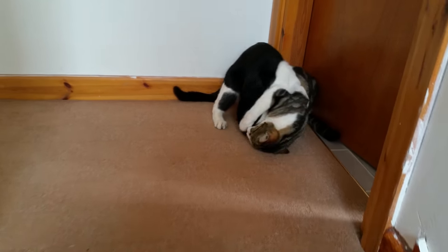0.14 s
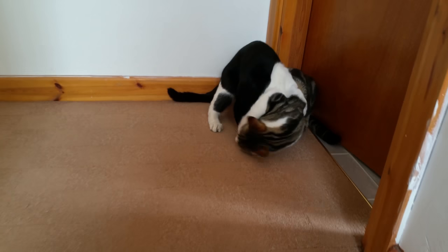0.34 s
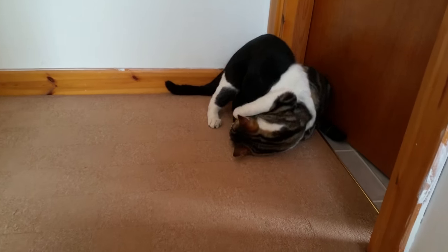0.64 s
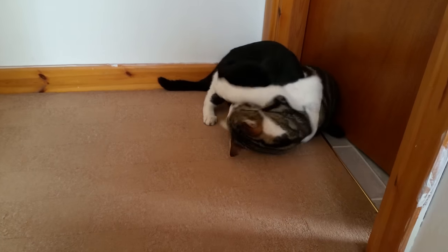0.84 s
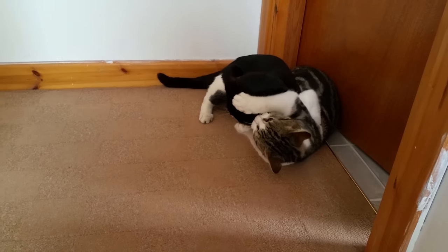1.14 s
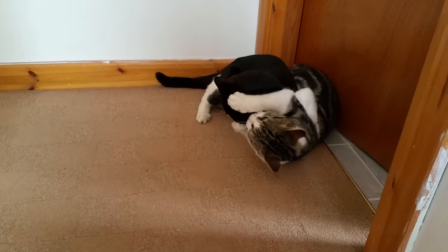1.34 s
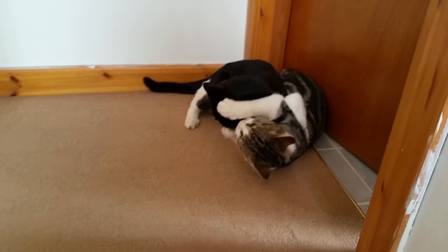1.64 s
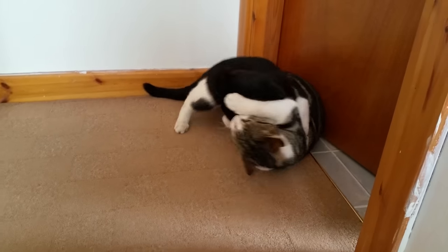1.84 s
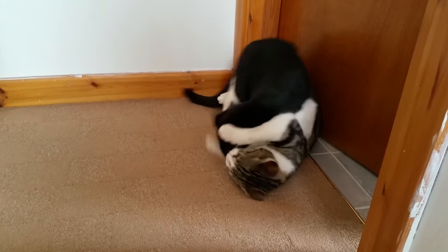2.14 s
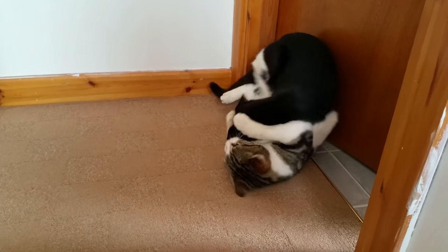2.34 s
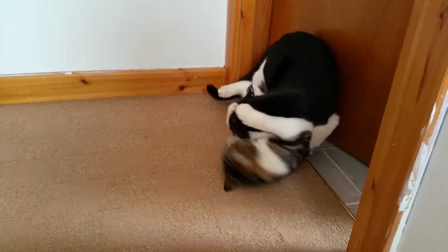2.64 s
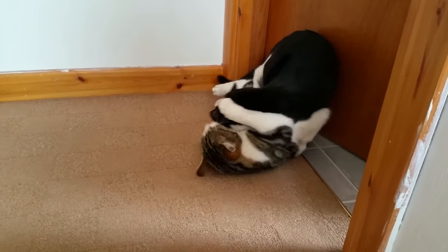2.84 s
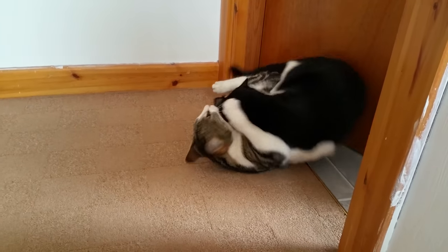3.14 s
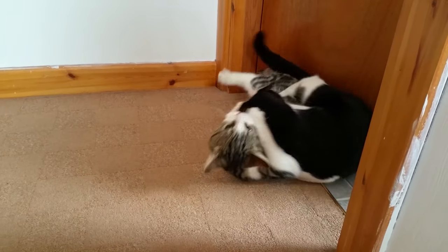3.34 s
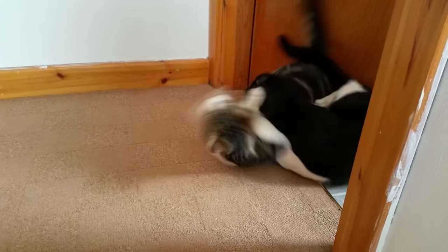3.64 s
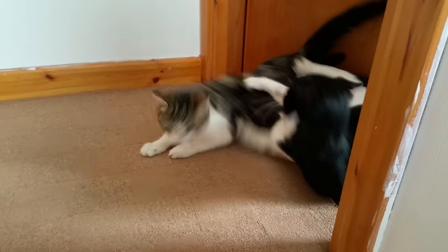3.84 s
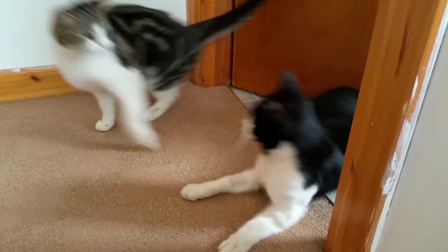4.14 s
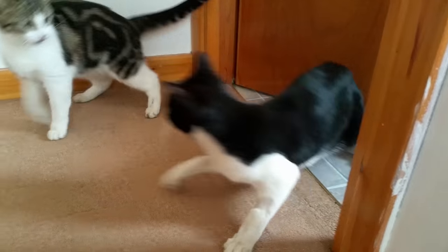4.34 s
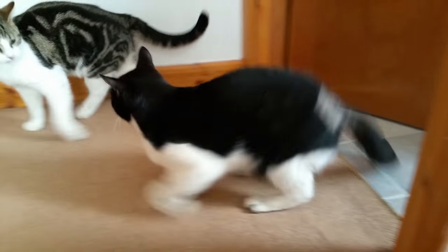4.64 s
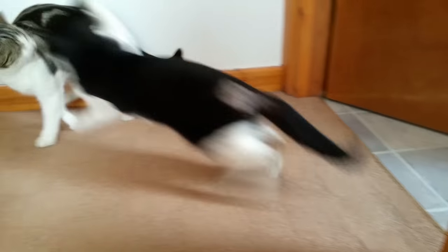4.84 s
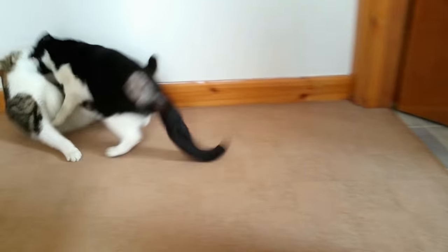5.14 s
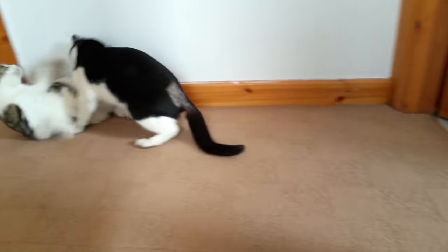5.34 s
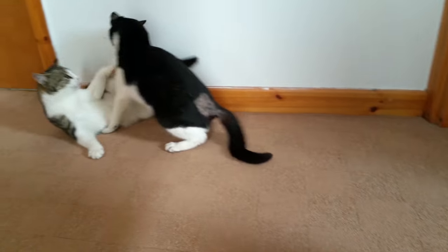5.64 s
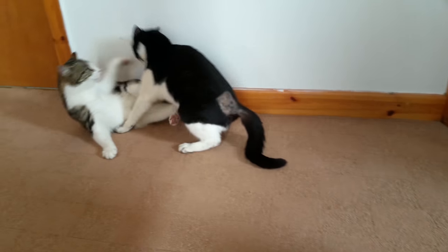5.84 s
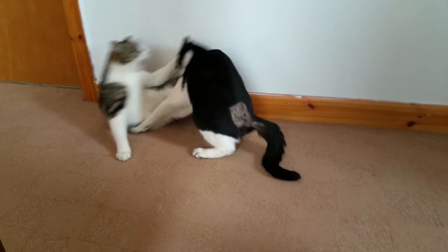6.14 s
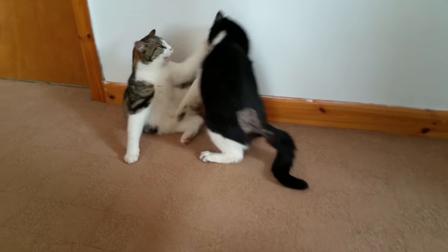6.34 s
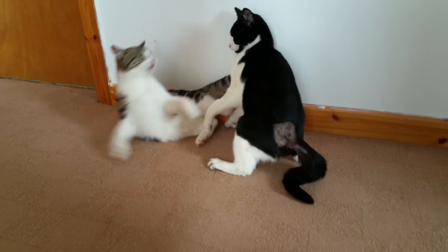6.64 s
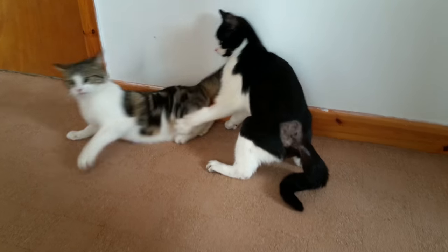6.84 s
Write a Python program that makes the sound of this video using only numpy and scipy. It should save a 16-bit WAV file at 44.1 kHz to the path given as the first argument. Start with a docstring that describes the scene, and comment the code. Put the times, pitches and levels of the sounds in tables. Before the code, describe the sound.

Over a soft rush of indoor air and a machine's faint hum and thin whine, a cat lets out a quiet, drawn-out, raspy meow. Scattered low bumps and light claw ticks on carpet follow as two cats tussle, growing busier with brief squeaky cries. A loud, short yowl breaks out among thumps, then one last meow and a bump. The sound is fairly close, with a slight echo from narrow hallway walls.

```python
"""A small carpeted hallway: two cats wrestle a metre or two from a phone with two microphone ports.
One meows, squeaks and yowls: vocal-fold harmonics through chest, mouth and throat, plus breath hiss.
Bodies and paws ring the boards of floor and door; claws tick in the pile; close walls echo.
Under it, the steady rush of house air and a household machine's faint hum and whine."""
import sys
import numpy as np
from scipy import signal
from scipy.fft import rfft, irfft
from scipy.io import wavfile
from scipy.ndimage import uniform_filter1d

SR = 44100
rng = np.random.default_rng(int(sys.argv[2]) if len(sys.argv) > 2 else 0)


def to_wav(s):
    """Save 16-bit WAV."""
    ch = np.atleast_2d(s).T  # columns
    pcm = np.round(np.clip(ch, -1, 1) * 32767)  # PCM
    wavfile.write(sys.argv[1], SR, pcm.astype(np.int16))


N = 308700
T = np.arange(N) / SR

# air rush: (frequency [Hz], relative density [dB])
AIR_SPECTRUM = [(15, -37), (25, -32), (60, -17), (171, -8), (275, -6), (381, -12.5), (541, -7),
                (705, -16.5), (1201, -20.5), (1501, -17.5), (2501, -29), (3731, -34), (5601, -33),
                (6001, -39), (15601, -46)]
# diffuse sound: (frequency [Hz], left-right correlation [-1..1])
COHERENCE = [(25, 0.77), (60, 0.95), (250, 0.95), (500, 0.56), (1000, -0.02), (2000, -0.17), (8000, -0.052)]
# machine tones: (frequency [Hz], rms level [dB], unsteady share [0..1], width [Hz], pan [dB])
HUM_TONES = [(280, -68, .9, 15, 1), (420, -72, .7, 8, 1), (549, -60, .15, 6, 2), (1500, -72, .7, 25, 2)]
# whine envelope, in consecutive stretches: (time [s], rms level [dB])
WHINE_LEVELS = [
    [(0.0, -84), (0.27, -71), (0.33, -74), (0.53, -67), (0.7, -82), (0.8, -69), (0.9, -73.5), (1.05, -88),
     (1.29, -77.5), (1.73, -73), (1.91, -81), (2.14, -76), (2.34, -82.5), (2.53, -70.5), (2.73, -78),
     (3.08, -82), (3.57, -81), (3.69, -71), (4.02, -79), (4.12, -80), (4.23, -73.5), (4.44, -83),
     (4.64, -66), (5.04, -71)],
    [(5.48, -68.5), (5.69, -72.5), (5.98, -70), (6.2, -78)],
    [(6.55, -80), (6.78, -71), (7.0, -76)],
]
# (time [s], pitch [Hz])
WHINE_PITCH = [(0, 4383), (2.3, 4376), (4.5, 4393), (7, 4404)]
# blows on floor and door: (time [s], level [dB], hardness [dB/octave], relative knock [dB])
THUMPS = [(0.012, -40.5, 2.5, -14), (1.089, -44, 0, -29), (1.169, -50.5, 7, -5), (2.149, -46, -1, -17),
          (2.796, -43.5, 5, -12), (2.823, -47, 7, 0), (2.928, -43, 5, -13), (2.95, -47, 5, -27),
          (3.13, -35.5, -5.5, -18), (3.449, -42.5, -5.5, -9), (3.838, -27.5, -6.5, -14),
          (3.973, -40.5, -1.5, -4.5), (4.21, -41.5, 1, -15), (4.271, -45.5, 9, -11), (4.296, -43, -4, -8),
          (4.313, -45, 5, -16), (4.4, -39, -5.5, -23), (4.85, -45.5, -12, -32), (5.166, -28, 5.5, -16),
          (5.176, -31.5, 18, -8), (5.189, -40.5, 5.5, -12), (5.29, -35.5, -1.5, -23), (5.396, -38, 20, 2.5),
          (5.493, -40.5, 10, -19), (5.501, -44, 8, -16), (5.736, -39, 1.5, -16), (5.756, -45, 1.5, -15),
          (5.78, -53, -16, 0), (6.483, -34, 0, -2), (6.587, -43, 1, -8)]
# (frequency [Hz], gain [dB], t60 [s])
BOARD_MODES = [(85.2, -14, 0.99), (110.2, -4.5, 0.3), (178.6, -0.5, 0.15), (232, 4, 0.077),
               (315.7, -9, 0.25), (410, 2, 0.051), (525, -2.5, 0.073), (630, -7, 0.096)]
# claws and fur in the carpet: (time [s], peak [dB], centre [Hz], t60 [s])
CLAW_TICKS = [(0.078, -58, 4000, .04), (1.94, -60, 2800, .25), (2.218, -53, 1650, .06),
              (2.908, -52, 1690, .1), (2.76, -71, 9500, 1.5), (2.92, -69, 9500, 1.5), (3.1, -67, 8500, .9),
              (3.555, -55, 5300, .025), (3.769, -52, 5600, .03), (4.087, -55, 3300, .025),
              (4.087, -58, 7500, .025), (4.27, -57, 1100, .06), (4.499, -61, 11100, .024),
              (4.948, -49, 750, .03), (5.81, -60, 5000, .05), (6.25, -50, 4700, .024)]
# a segment is a short cry, or a stretch of a longer cry between breaks of the voice
# per segment, breakpoints: (time [s], pitch [Hz], level [dB], mouth resonance [Hz], upper throat [dB])
SEGMENT_CONTOURS = [
    [(0.197, 369, -50, 2100, -17), (0.212, 393, -45.5, 2080, -15), (0.228, 382, -40, 2110, -24),
     (0.25, 454.6, -46.5, 2160, -11), (0.265, 542, -47, 2100, -14), (0.285, 576, -51, 2110, -7),
     (0.301, 665, -47.5, 2160, 7), (0.33, 604, -53, 2140, -1)],
    [(0.32, 577, -58, 1740, -1), (0.35, 673, -50, 1790, -14), (0.378, 652, -52.5, 1830, -3),
     (0.396, 667, -53, 1850, -8), (0.414, 685, -47.5, 2010, -5), (0.436, 664, -53.5, 2010, 11),
     (0.45, 710, -42.5, 2020, 8), (0.465, 677, -44, 2030, 14), (0.498, 674, -45, 2000, 11),
     (0.516, 653, -53, 2000, -2), (0.532, 696, -43, 2070, -1), (0.552, 688, -51.5, 2050, 6),
     (0.596, 693.5, -43, 2030, 11), (0.624, 708.4, -46, 1890, 8), (0.64, 686.6, -41.5, 1690, 6),
     (0.66, 689.5, -49, 1590, 7), (0.694, 675.6, -44.5, 1300, -8), (0.712, 667, -43, 1372, 0),
     (0.73, 679.4, -48, 1462, -3), (0.76, 693, -44.5, 1352, -5), (0.788, 664.5, -48, 1334, 0),
     (0.812, 678.5, -44, 1323, 2), (0.83, 698, -54, 1340, -5), (0.855, 673, -39, 1340, -25),
     (0.87, 672.4, -42.5, 1518, -28), (0.89, 677, -45, 1772, -33), (0.91, 690.7, -46, 2093, -28),
     (0.93, 697, -56, 2040, -30), (0.955, 653, -40, 1840, -38)],
    [(0.948, 654, -45, 1904, -12), (0.966, 522, -41, 1903, -15), (0.972, 520, -78, 1902, -40),
     (1.0, 530, -87.5, 1905, -12)],
    [(2.742, 506, -72, 2070, -20), (2.75, 502, -53, 2050, -20), (2.77, 463, -72, 2050, -20)],
    [(2.768, 520, -75, 2200, -14), (2.774, 486.5, -44, 2220, -19), (2.808, 488, -46, 2160, -7),
     (2.816, 476, -53, 2090, -3), (2.845, 457, -57, 1980, -14), (2.86, 470, -76, 1940, -14)],
    [(3.484, 1100, -62, 2150, -28), (3.496, 1139, -51, 2200, -28), (3.512, 1184, -47, 2000, -28),
     (3.526, 1177, -40, 2080, -30)],
    [(3.52, 1142, -30, 1950, -24), (3.532, 916, -42.5, 1950, -19), (3.558, 1064, -44, 1890, -18),
     (3.578, 1080, -56, 1950, -22), (3.595, 1070, -62, 1950, -24)],
    [(3.657, 610, -55, 1840, -20), (3.665, 605, -40.5, 1820, -15), (3.679, 538, -39.5, 1780, -7),
     (3.7, 536.5, -36.5, 1910, -20), (3.707, 540, -43.5, 1940, -22), (3.715, 534, -36, 2080, -20),
     (3.723, 540, -38, 2160, -17), (3.745, 549, -48.5, 2000, -18), (3.79, 529, -42.5, 1830, -21)],
    [(3.792, 1145, -65, 1280, -7), (3.802, 1210, -43.5, 1300, -2), (3.812, 1294, -43, 1300, -9),
     (3.821, 1255, -66, 1250, -3), (3.831, 1183, -44, 1200, 0), (3.845, 1180, -61, 1200, -4)],
    [(3.808, 1276, -57, 2780, -5), (3.82, 1384, -46, 2780, 6), (3.838, 1385, -51, 2780, -2),
     (3.87, 1400, -75, 2780, 0)],
    [(5.035, 770, -71, 2050, -10), (5.049, 712, -51, 2060, -33), (5.08, 661.5, -47.5, 2390, -12),
     (5.098, 703, -45, 2600, -4), (5.118, 698, -48, 2490, -7.5), (5.143, 739, -42, 2300, 1.5),
     (5.156, 725, -42, 2400, 2), (5.178, 726, -36, 2380, 6), (5.187, 682, -33.5, 2370, -8),
     (5.203, 687, -25.5, 2250, -13.5), (5.212, 657, -31, 2180, -17), (5.219, 614, -39, 2140, -14),
     (5.229, 574, -36.5, 2030, -37), (5.249, 552, -40.5, 1900, -20.5), (5.28, 543, -46, 2000, -16),
     (5.32, 546, -62.5, 2180, -14)],
    [(5.339, 722, -41, 2230, -9), (5.348, 719, -25.5, 2150, -14), (5.357, 759.6, -19.5, 2130, -17),
     (5.367, 773, -33, 2230, -19)],
    [(5.367, 753, -33, 2200, -26), (5.374, 733, -18.5, 2160, -31), (5.382, 742, -22.5, 2120, -23),
     (5.387, 719, -35, 2180, -26), (5.391, 707, -22.5, 2100, -27), (5.394, 719, -36, 2160, -29),
     (5.398, 699, -29, 2120, -27), (5.405, 683, -41, 2120, -30), (5.415, 676, -32.5, 2030, -29),
     (5.44, 690, -63.5, 2130, -12)],
    [(6.228, 598, -58, 1740, -4), (6.244, 623, -49.5, 1800, -15), (6.27, 552, -41.5, 2080, -16),
     (6.3, 641, -46, 2100, -7), (6.326, 695, -48, 1750, -4), (6.356, 675, -45.5, 1730, -5),
     (6.375, 733, -40, 1960, -6), (6.39, 670, -49, 2000, -4)],
    [(6.385, 635, -57, 1950, 3), (6.4, 631.5, -43, 1970, 14), (6.415, 656, -46.5, 1980, 5),
     (6.431, 681.5, -49, 1870, -7), (6.451, 651, -53.5, 1890, 7), (6.481, 677, -45, 2080, -1),
     (6.5, 728, -47.5, 2080, 10), (6.543, 729, -54.5, 1960, 20), (6.57, 740, -73, 1880, -2.5)],
]
# per segment: (chest [dB], chest [Hz], upper throat start, end [Hz], voice cutoff start, end [Hz],
# hiss [dB], pan [dB], right port lag [ms]); chest and hiss levels hold at SOFT_VOICE_DB
SEGMENT_THROATS = [(12, 690, 2700, 2940, 7600, 4000, -25, 0.5, 0.015),
                   (7.5, 940, 2200, 2540, 4350, 3100, -30.5, 2.5, 0.063),
                   (17, 486, 2900, 2900, 2040, 310, -35, -2, .04),
                   (-37, 880, 2950, 2900, 1400, 3200, -34, -3, .05),
                   (-5, 790, 2900, 4500, 3000, 2800, -31, 0, .05),
                   (-7, 1150, 2200, 3700, 5300, 2500, -26.5, 2, 0.039),
                   (-20, 1500, 2900, 4300, 2200, 4900, -24.5, -1, 0.044),
                   (-14.5, 1030, 4300, 3100, 3770, 3100, -19, -1.5, 0.082),
                   (-9, 880, 3100, 1900, 3400, 4100, -18, -2, .04),
                   (-4, 1100, 6030, 6400, 9100, 9100, -17, 1.5, 0.064),
                   (-5.5, 1250, 4760, 2700, 6900, 2500, -22, 0, .29),
                   (-10, 1450, 2800, 4000, 2900, 3500, -23.5, -1, 0.26),
                   (-18, 1100, 3800, 3800, 4600, 4500, -19.5, -1, 0.39),
                   (-9, 920, 5050, 3270, 4500, 4700, -22, -0.5, 0.16),
                   (-11, 750, 3930, 2440, 3930, 1580, -28.5, 2.5, 0.11)]
# fold irregularity per segment: (onset [0..1], settling [s], held [0..1], fraying [s], end [0..1])
SEGMENT_HOARSENESS = [(.7, .03, .45, .07, .3), (.55, .12, .05, .015, .3), (.7, .01, .75, .01, .8),
                      (.05, .01, .05, .01, .1), (1, .01, .9, .01, 1), (.3, .01, .25, .01, .35),
                      (.8, .01, .85, .05, .9), (.75, .035, .32, .05, .85), (.3, .005, .3, .005, .4),
                      (.45, .01, .4, .04, .9), (.7, .07, .4, .06, .55), (.04, .01, .04, .01, .1),
                      (.15, .015, .6, .045, 1), (.95, .13, .35, .01, .35), (.3, .01, .3, .01, .35)]
# air past the teeth, per segment: (low edge [Hz], high edge [Hz])
SEGMENT_HISS_BANDS = [(2260, 5100), (2240, 5200), (2255, 5900), (2260, 4400), (2260, 6300), (4500, 7500),
                      (4470, 6900), (4200, 6460), (4500, 7500), (4800, 8100), (3470, 6800), (2970, 9100),
                      (3000, 7800), (2970, 6800), (3000, 7500)]
# (time [s], hoarseness change [-1..1])
VOICE_CRACKS = [(.65, .5), (.72, .3), (5.175, .15), (5.192, -.2), (5.207, -.2), (5.12, .15), (6.46, .3)]
# the phone's body shades its ports: (frequency [Hz], pan [dB], extra left lead [rad])
PORT_SHADING = [(700, 3, 0), (1300, 2, 0), (2100, 6, 0), (2900, 9.5, .5), (3600, -2, 2.2), (4300, -2, 2.2),
                (5300, 0, 1), (8000, 0, 0)]

MOUTH_WIDTH_HZ, CHEST_WIDTH_HZ, UPPER_WIDTH_HZ = 720, 550, 750
SOFT_VOICE_DB, CHEST_DB_PER_DB, HISS_DB_PER_DB = -38, 0.18, 0.5248
CRACK_S, HALF_HARMONIC_DB, TWIST_RAD_PER_KHZ = .012, -2, .55


def undb(db):
    return 10 ** (np.asarray(db) / 20)


def unit_rms(x):
    return x / np.sqrt(np.mean(x ** 2, axis=-1, keepdims=True))


def band(x, lo_hz, hi_hz, order=2):
    sos = signal.butter(order, [lo_hz, min(hi_hz, .45 * SR)], "band", fs=SR, output="sos")
    return signal.sosfilt(sos, x)


def lowpass(x, hz, order):
    return signal.sosfilt(signal.butter(order, hz, fs=SR, output="sos"), x)


def pan(x, db):
    """Stereo; db is left minus right."""
    return x * undb(np.array([db / 2, -db / 2]).reshape(2, -1))


def walk(rate_hz, count=N):
    """Noise smoothed twice over 1 / rate_hz; spread 1."""
    width = max(int(SR / rate_hz), 1)
    once = uniform_filter1d(rng.standard_normal(count), width, mode="wrap")
    return np.sqrt(3 * width / 2) * uniform_filter1d(once, width, mode="wrap")


def flutter(share, rate_hz, count=N):
    """Complex gain of power 1; a share of it wanders in size and phase."""
    wander = (walk(rate_hz, count) + 1j * walk(rate_hz, count)) / np.sqrt(2)
    return np.sqrt(1 - share) + np.sqrt(share) * wander


def resonance(hz, centre_hz, width_hz):
    """Gain of a resonator passed twice."""
    return 1 / (1 + ((hz - centre_hz ** 2 / hz) / width_hz) ** 2)


def on_bins(table, count):
    """Table interpolated onto FFT bins in log frequency."""
    hz, values = np.transpose(table)
    return np.interp(np.log(np.fft.rfftfreq(count, 1 / SR) + 1), np.log(hz), values)


def diffuse_noise(count):
    """Stereo noise: alike in the bass, unrelated in the treble."""
    mid, side = rfft(rng.standard_normal((2, count)))
    coherence = on_bins(COHERENCE, count)
    mid, side = mid * np.sqrt((1 + coherence) / 2), side * np.sqrt((1 - coherence) / 2)
    return irfft(np.array([mid + side, mid - side]), count)


def house_air(level_db=-55):
    """Steady rush; the low part swells and flickers slightly."""
    rush = irfft(undb(on_bins(AIR_SPECTRUM, N)) * rfft(diffuse_noise(N)), N)
    swell = undb(walk(0.42) + 1.3 * walk(15))
    rush = rush + lowpass(rush, 900, order=2) * (swell - 1)
    return pan(unit_rms(rush) * undb(level_db), 1.53)


def machine_hum():
    """Thin tones, from near steady to narrow hiss."""
    out = 0
    for hz, db, share, width_hz, pan_db in HUM_TONES:
        skew_rad = hz / 1500 * np.array([[.5], [-.5]])
        tone = flutter(share, width_hz) * np.exp(1j * (2 * np.pi * hz * T + skew_rad))
        out = out + np.sqrt(2) * undb(db) * pan(tone.real, pan_db)
    return out


def machine_whine():
    """One high tone that swells, fades and creeps in pitch; stronger on the right."""
    hz = np.interp(T, *np.transpose(WHINE_PITCH))
    db = np.interp(T, *np.vstack(WHINE_LEVELS).T) + 0.74 * walk(25)
    phase = 2 * np.pi * np.cumsum(hz) / SR + np.array([[.8], [-.8]])
    return np.sqrt(2) * pan(undb(db) * np.cos(phase), -3.8)


def thumps():
    """Blows ring loose, rattling boards and add a short knock; hard ones favour upper modes."""
    out, t = np.zeros(N + SR), T[:SR // 2]
    for at_s, db, hard_db_per_oct, knock_db in THUMPS:
        ring = 0
        for hz, mode_db, t60_s in BOARD_MODES:
            gain = undb(mode_db + hard_db_per_oct * np.log2(hz / 150) + 1.5 * rng.standard_normal())
            detuned_hz = hz * (1 + 0.027 * rng.standard_normal())
            ring = ring + gain * np.sin(2 * np.pi * detuned_hz * t) * 1000 ** (-t / t60_s)
        rattle = 1 + np.clip(t / 0.0033, 0, .5) * walk(52, len(t))
        ring = ring * np.clip(t / 0.0015, 0, 1) * rattle
        knock_decay = 1000 ** (-t / 0.21) + .4 * 1000 ** (-t / .04)
        knock = band(rng.standard_normal(len(t)) * knock_decay, 223, 1200)
        blow = ring / abs(ring).max() + undb(knock_db) * knock / abs(knock).max()
        start = int(at_s * SR)
        out[start:start + len(t)] += undb(db) * blow
    return pan(band(out[:N], 88, 4000, order=3), 2.1)


def claws():
    """Claws and fur catch in the pile: octave-wide noise ticks."""
    out, t = np.zeros(N + SR), T[:SR // 3]
    for at_s, db, hz, t60_s in CLAW_TICKS:
        edges = np.minimum(t / t60_s / .08, 1) * np.minimum((t[-1] - t) / .1, 1)
        burst = rng.standard_normal(len(t)) * edges * 1000 ** (-t / t60_s)
        tick = band(burst, hz / 1.4, hz * 1.4, order=3)
        start = int(at_s * SR)
        out[start:start + len(t)] += undb(db) * tick / abs(tick).max()
    return pan(out[:N], 0.77)


def fold_hoarseness(t, start_s, end_s, shape):
    """Irregularity of the folds, 0..1: settles, holds, frays; cracks shift it briefly."""
    onset, settle_s, held, fray_s, end = shape
    course = np.interp(t, [start_s, start_s + settle_s, end_s - fray_s, end_s], [onset, held, held, end])
    cracks = sum(change * np.exp(-((t - at_s) / CRACK_S) ** 2) for at_s, change in VOICE_CRACKS)
    return np.clip(course + cracks, 0, 1)


def breath_hiss(fold_phase, band_hz):
    """Air past the teeth, pulsed by the folds."""
    noise = rng.standard_normal((2, len(fold_phase)))
    hiss = unit_rms(band(noise, *band_hz, order=3)) + undb(-15) * unit_rms(band(noise, 8500, 13000))
    return (1 + 0.15 * np.cos(fold_phase)) * pan(hiss, -0.4)


def cry_segment(contour, throat, hoarse_shape, hiss_band_hz, block=10240):
    """Vocal-fold harmonics through chest, mouth and upper throat; hoarseness smears them to noise."""
    times_s, *columns = np.transpose(contour)
    start_s, end_s = span_s = times_s[[0, -1]]
    start, count = int(start_s * SR), block * (1 + int((end_s - start_s) * SR) // block)
    t = start_s + T[:count]
    pitch_hz, db, mouth_hz, upper_db = (np.interp(t, times_s, column) for column in columns)
    chest_db, chest_hz, upper0_hz, upper1_hz, top0_hz, top1_hz, hiss_db, pan_db, lag_ms = throat
    upper_hz = np.interp(t, span_s, [upper0_hz, upper1_hz])
    top_hz = np.interp(t, span_s, [top0_hz, top1_hz])
    effort_db = db - SOFT_VOICE_DB  # with effort the mouth outgrows chest and hiss
    chest_db = chest_db - CHEST_DB_PER_DB * effort_db
    hiss_db = hiss_db - HISS_DB_PER_DB * effort_db
    hoarse = fold_hoarseness(t, start_s, end_s, hoarse_shape)
    jitter = 1 + .0035 * walk(55, count) + .04 * hoarse * walk(250, count)
    fold_phase = 2 * np.pi * np.cumsum(pitch_hz * jitter) / SR
    port_hz, port_db, port_rad = np.transpose(PORT_SHADING)
    twist = TWIST_RAD_PER_KHZ * walk(16.2, count)  # port lag wanders as the cat twists
    voice = power = 0
    for harmonic in np.arange(2, 19) / 2:
        hz = harmonic * pitch_hz
        gain = (resonance(hz, mouth_hz, MOUTH_WIDTH_HZ)
                + undb(chest_db) * resonance(hz, chest_hz, CHEST_WIDTH_HZ)
                + undb(upper_db) * resonance(hz, upper_hz, UPPER_WIDTH_HZ) + undb(-34.5))
        gain /= np.sqrt(1 + (hz / top_hz) ** 16)
        if harmonic % 1:  # hoarse folds alternate strong and weak beats
            gain *= undb(HALF_HARMONIC_DB) * hoarse ** 2
        swell = undb(1.8 * np.array([walk(30, count) for _ in range(2)]))  # head and tongue move
        lead_rad = 2 * np.pi * hz * lag_ms / 1000 + np.interp(hz, port_hz, port_rad)
        lead_rad += twist * np.clip(hz / 1000 - 1, 0, 2)
        smear = flutter(hoarse, 320, count)
        phase = harmonic * fold_phase + 2 * np.pi * rng.random() + lead_rad * np.array([[.5], [-.5]])
        partial = gain * swell * (smear * np.exp(1j * phase)).real
        voice = voice + pan(partial, pan_db + np.interp(hz, port_hz, port_db))
        power = power + gain ** 2 / 2
    hiss = undb(hiss_db) * breath_hiss(fold_phase, hiss_band_hz)
    shimmer = 1 + 0.075 * hoarse * np.tanh(walk(68, count))
    gate = np.clip(np.minimum(t - start_s, end_s - t) / .0025, 0, 1)
    out = np.zeros((2, N + count))
    out[:, start:start + count] = gate * undb(db) * (shimmer * voice / np.sqrt(power) + hiss)
    return out[:, :N]


def hall_echo(x, level_db=-9, low_t60_s=0.45, treble_t60_s=.2):
    """Close walls: a dense echo, shorter in the treble."""
    t = T[:SR // 2]
    noise = diffuse_noise(len(t))
    low = lowpass(noise, 2500, order=1)
    response = low * 1000 ** (-t / low_t60_s) + (noise - low) * 1000 ** (-t / treble_t60_s)
    response *= np.clip((t - .003) / .003, 0, 1)
    response /= np.linalg.norm(response, axis=1, keepdims=True)
    return undb(level_db) * signal.fftconvolve(x, response, axes=1)[:, :N]


def scene():
    """Cats and their echo over air and machine."""
    segments = zip(SEGMENT_CONTOURS, SEGMENT_THROATS, SEGMENT_HOARSENESS, SEGMENT_HISS_BANDS)
    cats = sum(cry_segment(*segment) for segment in segments) + thumps() + claws()
    return cats + hall_echo(cats) + house_air() + machine_hum() + machine_whine()


def record(dry):
    """The phone cuts the top steeply."""
    cutoff_hz = 15700
    return signal.sosfilt(signal.ellip(10, .2, 60, cutoff_hz, fs=SR, output="sos"), dry)


dry = scene()
out = record(dry)
to_wav(out)
```